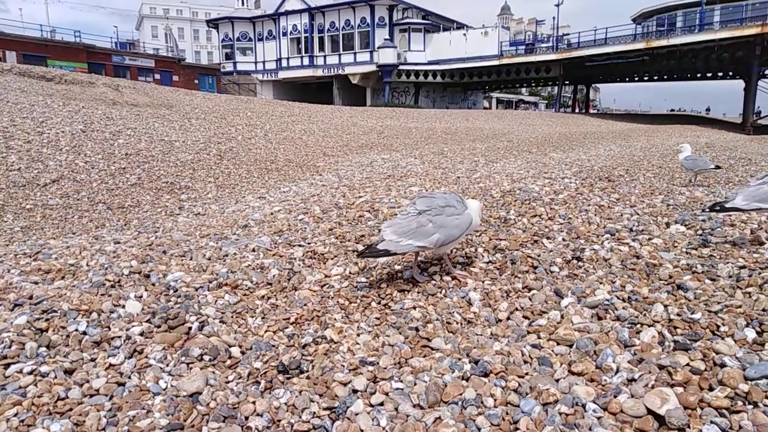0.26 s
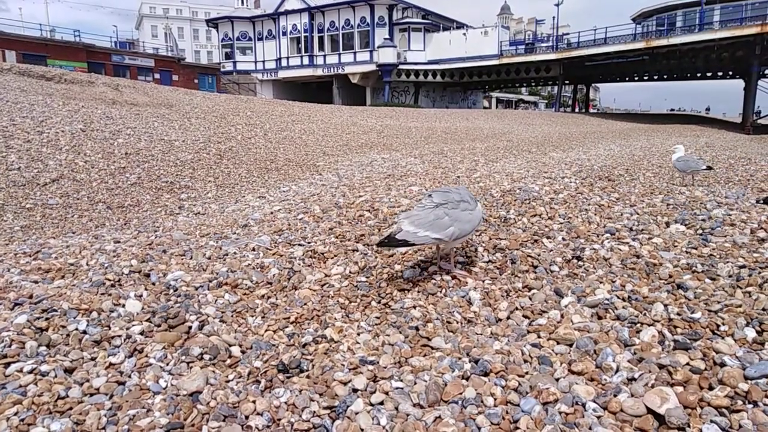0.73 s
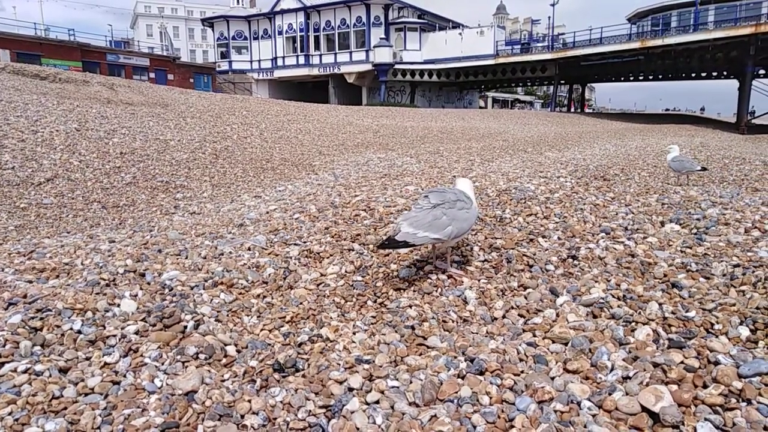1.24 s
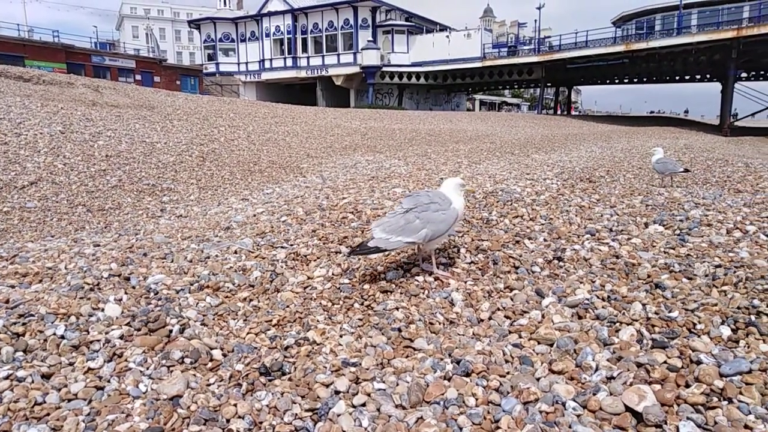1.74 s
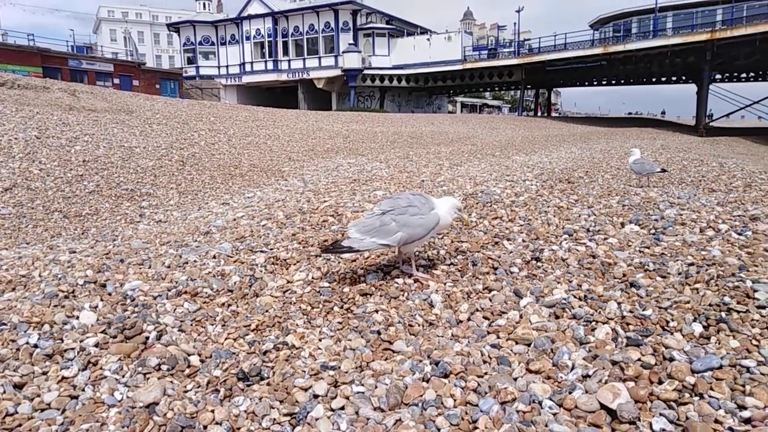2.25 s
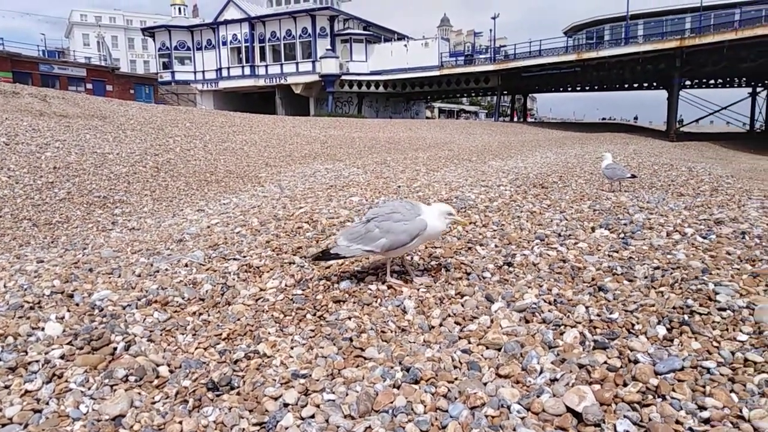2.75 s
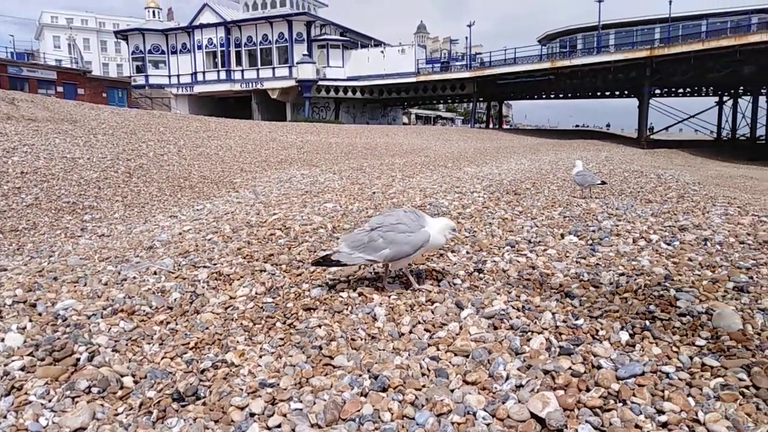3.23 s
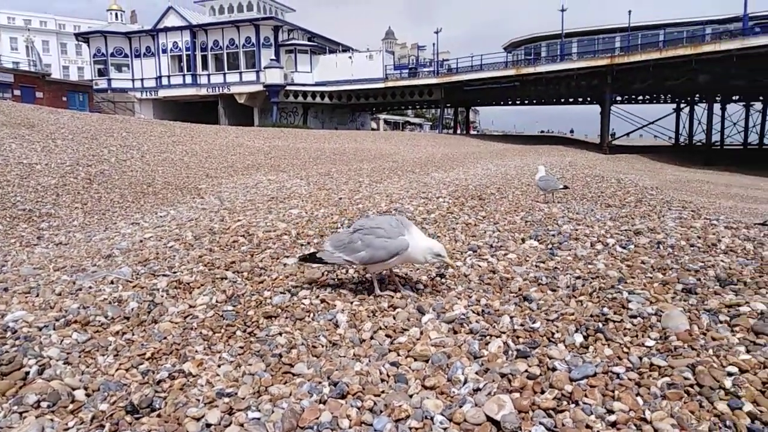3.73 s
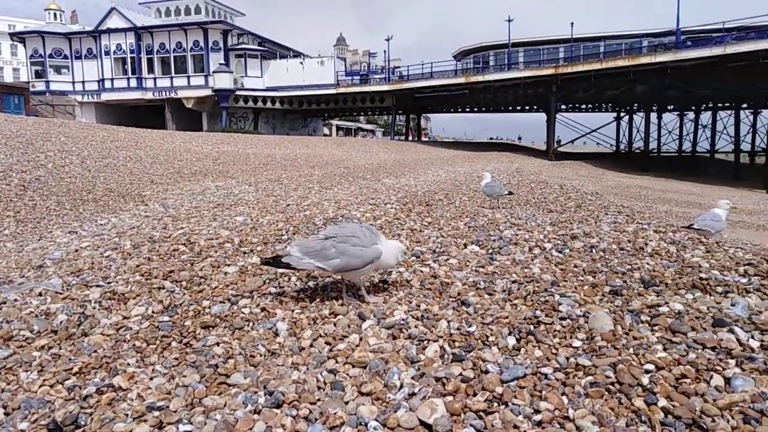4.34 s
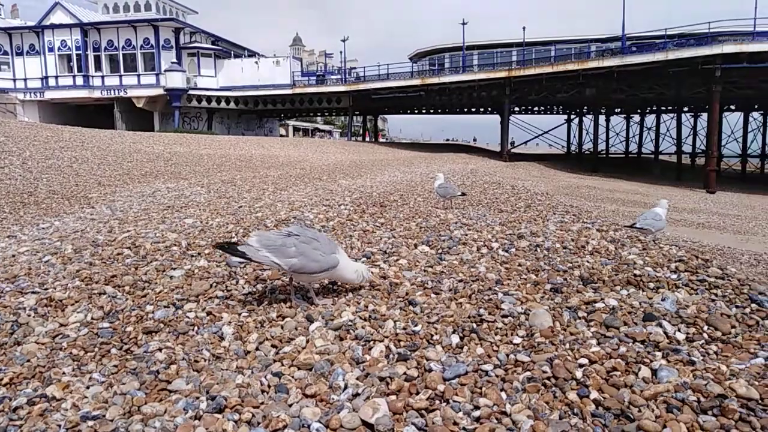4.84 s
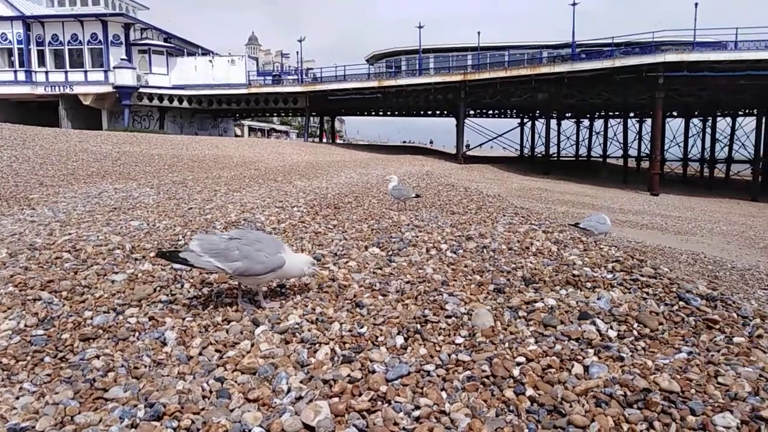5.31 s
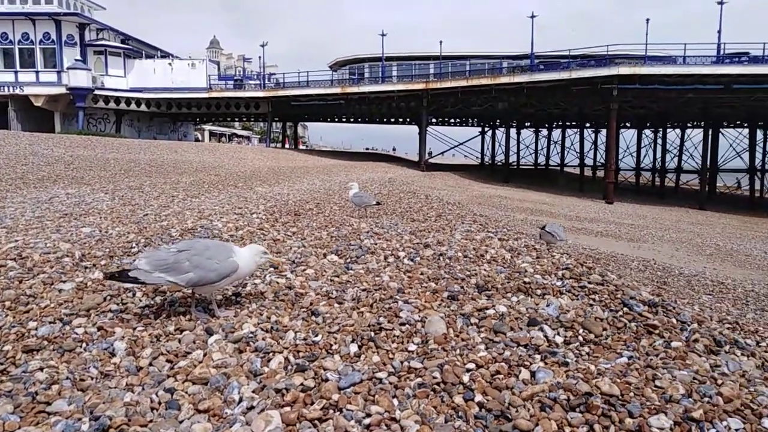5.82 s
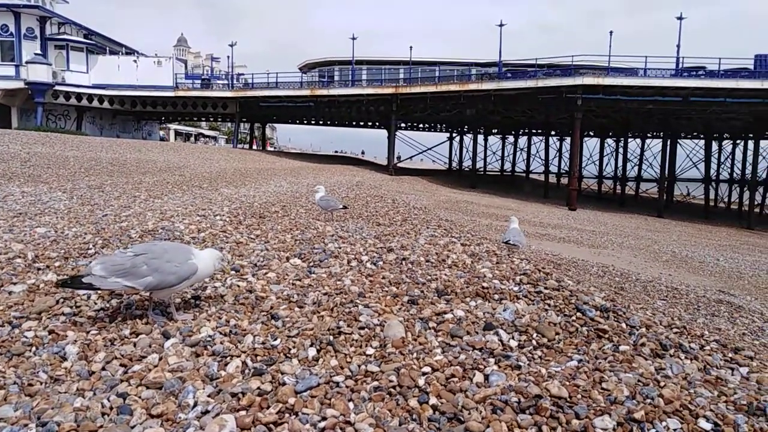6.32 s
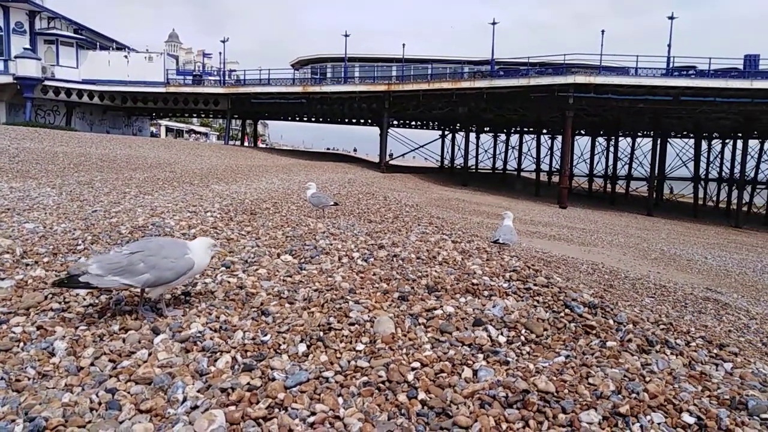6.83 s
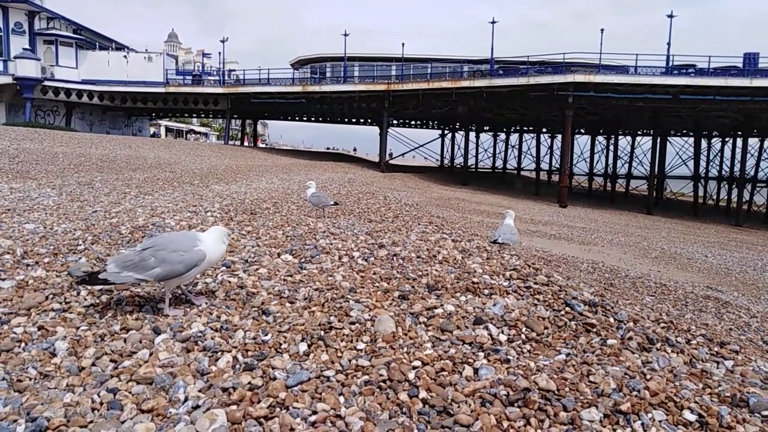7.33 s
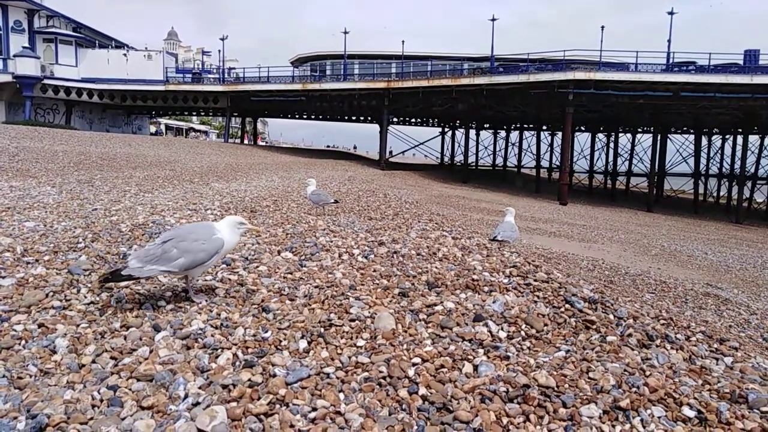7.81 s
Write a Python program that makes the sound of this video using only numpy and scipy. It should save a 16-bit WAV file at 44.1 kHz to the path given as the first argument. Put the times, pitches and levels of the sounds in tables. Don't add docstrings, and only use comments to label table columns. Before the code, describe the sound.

Outdoor stereo beach ambience: a near gull's high whistled cry, left of centre, opens the scene and returns twice, weaker. Distant adult gulls mew softly, then give a run of short falling yelps. Small stones knock and grind close to the right. Surf hisses steadily, rising once mid-way, and low gust thumps hit the microphone early and again later.

```python
import sys
import numpy as np
from scipy import signal
from scipy.fft import rfft, irfft
from scipy.io import wavfile
from scipy.ndimage import uniform_filter1d

SR = 44100
rng = np.random.default_rng(int(sys.argv[2]) if len(sys.argv) > 2 else 0)


def bounce(signal):
    frames = np.transpose(np.atleast_2d(signal))
    limited = np.clip(frames, -1, 1)
    pcm = np.round(limited * 32767).astype(np.int16)
    wavfile.write(sys.argv[1], SR, pcm)


def how_loud(loudness_db):
    steps = np.asarray(loudness_db, float) / 20
    return 10 ** steps


N = 355887

# [t/s, left over right/dB, breath re whistle/dB, flutter depth/dB]
CRIES = [
    (.3, 8.5, -25.5, 2),
    (3.55, 8, -11, 11),
    (6.0, 5.5, -21, -2.5),
]
# [t/s, length/s, start f/Hz, end f/Hz, level/dB]
FIRST_CRY = [(0.31, 0.012, 4050, 4840, -41), (0.313, 0.026, 3430, 3215, -45),
             (0.347, 0.013, 3230, 3460, -44), (0.336, 0.016, 4780, 4980, -39),
             (0.35, 0.031, 4010, 4045, -34.5), (0.38, .018, 4050, 4030, -49),
             (0.383, 0.023, 4650, 4760, -34), (0.408, 0.011, 4460, 4560, -32),
             (.398, .027, 5000, 5500, -34), (.422, .127, 5670, 5630, -31), (.551, .158, 5140, 5020, -28.5),
             (.539, .016, 5520, 5170, -33), (.699, .014, 4890, 4430, -33), (0.708, 0.11, 4380, 4250, -30.5),
             (0.814, 0.028, 3670, 3450, -45), (0.849, 0.018, 2950, 2850, -55)]
SECOND_CRY = [
    (3.59, .025, 6600, 6750, -51),
    (3.617, .062, 4590, 4640, -44),
    (3.665, .035, 5150, 5430, -45),
    (3.7, .229, 5400, 5110, -42.5),
    (3.942, .095, 4530, 4430, -44),
]
THIRD_CRY = [(6.022, 0.02, 2920, 2920, -60), (6.033, 0.0305, 3690, 3400, -54.5),
             (6.055, 0.035, 3430, 3440, -48), (6.086, 0.049, 4200, 4400, -47.5),
             (6.122, 0.023, 5200, 5470, -45.5), (6.152, 0.05, 5840, 5690, -46.5),
             (6.2, 0.019, 5650, 5350, -56), (6.366, 0.012, 4980, 4540, -50),
             (6.211, .162, 5270, 5100, -44.5), (6.378, 0.13, 4440, 4274, -37.5),
             (6.52, 0.02, 3800, 4000, -74)]
# [t/s, length/s, start f/Hz, end f/Hz, level/dB]
HOARSE_STRAND = [(.325, .06, 4320, 4570, -51), (.36, 0.053, 3370, 3260, -57), (.4, 0.019, 3630, 3780, -52),
                 (0.425, 0.054, 4620, 4700, -48), (.475, 0.086, 4840, 4540, -48),
                 (.53, 0.14, 4580, 4260, -42), (6.12, 0.1, 4800, 4640, -56),
                 (6.221, 0.16, 4480, 4130, -56.5)]
# [f/Hz, level/dB]
BEAK = [(5900, -31), (6300, 28), (6900, -34.5), (7100, -40.5), (7900, 13), (8100, -15.5), (8400, -65),
        (9700, -49), (10300, -32.5), (12500, -29), (14000, -52.5)]

# [t/s, level/dB, hold/s, lower edge f/Hz]
SHIFTS = [(0.206, -62, 0.012, 9400), (0.597, -68.5, 0.034, 11000), (1.03, -79, 0.0045, 12000),
          (1.21, -65.5, 0.034, 4000), (2.604, -67, 0.017, 5900), (2.877, -59, 0.091, 7250),
          (3.035, -69.5, 0.056, 7450), (3.2, -94, 0.11, 8060), (3.457, -63.5, 0.089, 5030),
          (3.604, -62, 0.081, 6800), (3.818, -52, 0.1, 5500), (3.971, -55.5, 0.025, 5460),
          (4.063, -54.5, 0.024, 6760), (4.155, -57, 0.02, 6800), (4.274, -63.5, 0.0079, 7000),
          (4.398, -60, 0.08, 7100), (4.57, -55.5, 0.057, 5700), (4.715, -66.5, .04, 8050),
          (4.843, -70, 0.019, 5130), (4.903, -66.5, 0.054, 7200), (5.02, -69, .02, 7200),
          (5.094, -72.5, 0.1, 9100), (5.247, -68, 0.098, 8000), (5.868, -60, 0.016, 7000),
          (6.274, -66, 0.055, 9800), (6.596, -59, 0.04, 9750), (6.698, -61.5, .01, 7900),
          (6.774, -62.5, 0.021, 8400), (6.958, -64.5, 0.027, 8600), (7.208, -71, 0.11, 9700),
          (7.368, -64, 0.023, 8330), (7.828, -64.5, 0.023, 8500)]
# [t/s, peak level/dB, left over right/dB, ring f/Hz]
KNOCKS = [(.1949, -37, -5, 10300), (1.0335, -48, -6, 13000), (1.1877, -33, -3, 5040),
          (1.1912, -28.5, 2.5, 5960), (2.607, -40, 7, 6600), (2.758, -44, -10, 10000),
          (2.8584, -44, -9, 12000), (2.8862, -46, -9, 12000), (2.9126, -30, -10, 10500),
          (3.0599, -37, -10, 10500), (3.457, -23, -6, 10600), (3.6038, -33.5, -6, 12000),
          (3.8214, -36, -9, 12100), (3.9815, -34, -1, 8360), (4.1505, -36, -3, 11000),
          (4.4486, -42, -12, 11400), (4.5497, -38, -6, 10600), (4.559, -33, 0, 8000),
          (4.5886, -30, -8, 11800), (4.7542, -40.5, -7, 11200), (4.8339, -37, -9, 7940),
          (4.8852, -32, -1, 5800), (4.9586, -38.5, -8, 10400), (5.0226, -35, -6, 11300),
          (5.0651, -36.5, -10, 10400), (5.139, -42.5, -9, 9700), (5.166, -42, -7, 11600),
          (5.2868, -30, -7, 6400), (5.8175, -40, -12, 13400), (5.862, -35, -1, 12100),
          (6.542, -41, -6, 11700), (6.6011, -38, -7, 5700), (6.7492, -34, 2, 4600), (6.752, -32, -6, 13700),
          (6.773, -34, -7, 10400), (6.8665, -38, -7, 10100), (6.9564, -37, -0.5, 7100),
          (7.3667, -37.5, -11, 11800), (7.8184, -38, 2, 5600)]
# [f/Hz, level/dB]
GRIT = [(2500, -23), (4000, 0.5), (6000, 12.5), (6800, -7.5), (7500, 4), (8500, 4), (11000, 6),
        (13000, 2.5), (14300, -5), (15500, -50)]
# [f/Hz, level/dB]
STONE = [(2500, -11), (4500, -1), (13000, 1.5), (16000, -10)]

# [t/s, f/Hz, level/dB]
MEWS = [
    [(.505, 1082, -62), (.56, 1035, -61), (.645, 855, -59.5)],
    [(.505, 1194, -54), (.54, 1219, -57), (.58, 1340, -64)],
    [(.635, 1036, -54), (.69, 1026, -54)],
    [(.695, 990, -60), (.745, 910, -60.5)],
    [(1.04, 900, -63), (1.07, 968, -57.5), (1.105, 910, -60)],
    [(1.33, 1266, -72), (1.355, 1287, -53), (1.38, 1263, -59), (1.48, 1273, -57), (1.58, 1268, -64),
     (1.655, 1232, -66)],
    [(1.925, 1820, -70), (2.0, 1990, -75)],
    [(2.045, 1880, -67), (2.085, 1840, -69)],
    [(2.045, 1280, -56), (2.09, 1311, -58), (2.125, 1263, -64), (2.205, 1293, -53.5), (2.255, 1285, -62.5),
     (2.355, 1322, -56.5), (2.41, 1235, -62)],
]
# [t/s, level/dB, f/Hz, length/s, third multiple/dB]
YELPS = [(1.665, -63.5, 1188, 0.09, 2.5), (2.405, -65, 1214, 0.082, 7.5), (2.54, -69, 1045, 0.066, 2),
         (2.68, -70, 1025, 0.049, 9), (2.925, -67, 1101, 0.09, 14.5), (3.105, -69.5, 1085, 0.047, 13),
         (3.2, -63.5, 1108, .09, 2), (3.345, -68, 1092, .05, 11), (3.45, -67, 1103, 0.075, 10.5),
         (3.76, -63, 1120, 0.053, 2), (3.9, -70, 1153, 0.082, 14), (4.035, -62.5, 1122, 0.059, 3),
         (4.21, -74.5, 1130, 0.074, 10.5), (4.305, -61.5, 1132, 0.072, 5), (4.45, -70, 1165, 0.089, 0),
         (4.62, -62.5, 1135, 0.072, -9), (4.85, -64.5, 1140, 0.054, 7), (4.95, -60, 1106, 0.085, -10),
         (5.345, -66.5, 1126, .05, -3), (5.43, -59.5, 1163, 0.083, -11.5)]
YELP_MULTIPLES = [2.5, -4, -2, -15]

# [f/Hz, level/dB per Hz]
SURF = [(40, -75.5), (90, -73.5), (170, -70.5), (260, -74.5), (430, -77.5), (700, -80), (1400, -86.5),
        (2200, -85.5), (2650, -91), (3000, -108), (3350, -99), (3750, -101), (4400, -91.5), (4850, -96),
        (5250, -105), (6500, -112), (15000, -125)]
# [f/Hz, left over right/dB]
SURF_PAN = [(500, 0), (1200, -0.5), (2200, 4.5), (3000, -3), (4400, 7), (9000, 2)]
# [f/Hz, share 0-1]
SAME = [(200, 1), (450, 1), (700, 0.47), (2200, 0.58)]
# [t/s, surge/dB]
SURGE = [(0, -0.5), (1.5, -1.5), (2.2, 0.5), (2.8, 3), (3.4, 7.5), (4.2, 4.5), (5, 1.5), (6.2, 0), (7.4, 2),
         (8.07, 0.5)]
# [t/s, dip f/Hz, dip depth/dB, dip width/Hz]
TURN = [(0, 1430, 21, 216), (1.5, 1520, 22.5, 239), (2.8, 1446, 24, 170), (3.8, 1550, 17, 119),
        (5, 1477, 5.5, 80), (6, 1257, 13.5, 120), (8.07, 1317, -2.5, 68.4)]

# [t/s, level/dB, left over right/dB]
BREEZE = [
    (0.0, -45.5, -2),
    (4.74, -61.5, -2.5),
    (5.08, -40, 3.5),
    (8.07, -75, -5.5),
]
# [t/s, level/dB, length/s]
THUMPS_LEFT = [(0.625, -35.5, 0.021), (0.853, -36, 0.029), (0.899, -36, 0.018), (0.986, -31, 0.023),
               (1.054, -23.5, 0.019), (1.084, -18.5, 0.0033), (1.137, -30.5, 0.048), (1.216, -33, 0.011),
               (1.294, -32.5, 0.037), (1.344, -32.5, 0.014), (2.472, -35, 0.03), (4.4, -30.5, 0.0063),
               (4.62, -54, 0.043), (4.76, -43, 0.066), (4.89, -45, 0.027), (4.956, -23.5, 0.0079),
               (4.978, -20, 0.011), (5.073, -25.5, 0.029), (5.15, -24.5, 0.0021), (5.318, -24.5, 0.0076),
               (5.361, -20.5, 0.027), (5.397, -30.5, 0.031), (5.512, -21, 0.0027), (5.557, -28, 0.051),
               (5.752, -32, 0.019), (5.83, -35, 0.05), (5.921, -27.5, 0.036), (5.968, -26.5, 0.0084),
               (6.13, -33, 0.073), (6.196, -28, 0.0084), (6.221, -29.5, 0.02), (6.265, -30, 0.021),
               (6.313, -31.5, 0.0071), (6.455, -39, 0.07)]
THUMPS_RIGHT = [(0.029, -30.5, 0.01), (0.325, -43, 0.012), (0.38, -35, 0.0059), (0.449, -38.5, 0.08),
                (0.895, -28.5, 0.019), (0.967, -25, 0.0087), (1.039, -28, 0.0089), (1.09, -31, 0.023),
                (1.141, -30.5, 0.012), (1.269, -31.5, 0.032), (1.404, -32, 0.028), (1.693, -39, 0.03),
                (1.746, -32, 0.0077), (2.211, -37, 0.011), (2.409, -33.5, 0.08), (2.474, -36, 0.0073),
                (4.497, -40.5, 0.05), (4.682, -41, 0.016), (4.737, -37, 0.078), (4.772, -47, 0.0084),
                (5.142, -37, 0.03), (5.263, -30, 0.037), (5.41, -27, 0.013), (6.191, -36, 0.034),
                (6.338, -37, 0.016), (6.521, -43, 0.023)]
# [f/Hz, level/dB]
THUMP = [(25, -70), (50, -11.5), (80, 4.5), (120, 0), (200, -5), (350, -25), (700, -44), (3000, -110)]

# [f/Hz, level/dB per Hz]
GATE = [(1000, -100), (1500, -89), (2500, -100), (3000, -99), (4500, -103), (6000, -103), (14000, -105)]

SCOOP_HZ, SETTLE_S, DROOP_HZ, DROOP_S, HELD_S = 170, 0.0042, 165, 0.0193, 0.084
TOP_HZ = 5340
FADE_DB = -7.5
FLUTTER_PER_S = 37

SLIDE_DB_PER_S, SETTLE_DB_PER_S, TRICKLE_DB_PER_S, TRICKLE_DB = 592, 176.5, 45.5, -13
THIN_DB, EDGE_HZ = -10, 300
SNAP_S, CRACK_DB, RING_DB, RATTLE_DB = 0.0016, -11, -23, -33

ROAR_SHARE, WASH_SHARE, FIZZ_SHARE, FIZZ_DB = 0.44, 0.65, 1.78, -5.5

LAG, FAR_LAG = 19, 4
HISS_DB = -81.5
MASK_TOP_DB = -69


def evened(x):
    return x / np.sqrt(np.mean(x ** 2) + 1e-20)


def read(points, hz):
    f, value = np.transpose(points)
    return np.interp(np.log(hz + 1), np.log(f + 1), value)


def add(mix, s, sound):
    part = mix[..., max(round(s * SR), 0):][..., :sound.shape[-1]]
    part += sound[..., :part.shape[-1]]


def panned(x, db):
    return x * how_loud([db / 2, -db / 2]).reshape(2, -1)


def coloured(x, points):
    gain = how_loud(read(points, np.fft.rfftfreq(x.shape[-1], 1 / SR)))
    return irfft(rfft(x) * gain, x.shape[-1])


def drift(shape, sizes):
    x = rng.standard_normal(shape)
    for axis, size in enumerate(sizes):
        x = uniform_filter1d(uniform_filter1d(x, size, axis), size, axis)
    return evened(x)


def voice(t, hz, level_db, tones, waver, edge_s):
    turns = np.cumsum(hz * (1 + waver * drift(len(t), [120]))) / SR
    stack = sum(how_loud(tones(k, hz)) * np.sin(2 * np.pi * k * turns) for k in range(1, 5))
    ends = np.clip(np.minimum(t - t[0], t[-1] - t) / edge_s, 0, 1)
    return np.sqrt(2) * how_loud(level_db) * stack * ends


def beach(x, t60, hz):
    size = SR // 2
    taps = rng.choice([-1., 1.], (2, size)) * (rng.random((2, size)) < .05)
    tail = signal.lfilter(*signal.butter(2, hz, fs=SR), taps)
    tail = tail * how_loud(-60 * np.arange(size) / SR / t60)
    return signal.fftconvolve(x[None], tail / np.linalg.norm(tail[0]), axes=1)[:, :N]


def young_gull():
    out = np.zeros((2, N))
    haze = np.zeros(N)
    throat = [(3300, -17.5), (3900, 13.0), (5800, 8), (6100, -19.5)]
    breath = evened(coloured(rng.standard_normal(N), throat))

    def overtones(k, f):
        if k == 1:
            return 0
        return np.where(k * f < 14500, read(BEAK, k * f) - 1.0 * (k - 2), -99)

    for row in FIRST_CRY + SECOND_CRY + THIRD_CRY + HOARSE_STRAND:
        _, pan_db, breath_db, flutter_db = [cry for cry in CRIES if cry[0] <= row[0] + .05][-1]
        t, hz, level_db = register(*row)
        weak = np.clip((-39.5 - level_db.max()) / 12, 0, 1)
        rough_db = level_db + (0.51 + 4.3 * weak) * drift(len(t), [200])
        note = voice(t, hz, rough_db, overtones, 0.0029 + 0.0085 * weak ** 2, 0.013)
        flutter = np.sin(np.pi * FLUTTER_PER_S * t + 0.8 * np.sin(40 * t)) ** 6
        note *= how_loud(-flutter_db * np.clip((t - t[0]) / .2, .25, 1) * flutter)
        air = how_loud(level_db + breath_db) * breath[round(t[0] * SR):][:len(t)]
        note += air
        add(haze, t[0], how_loud(13) * air)
        add(out, t[0], note * how_loud([[0], [-pan_db]]))
    out[1] = coloured(out[1], [(6000, -3.5), (9000, 11)])
    return out + panned(how_loud(-20.5) * beach(out[0] + haze, 0.57, 6900), 3.0)


def register(start, length, from_hz, to_hz, level_db):
    t = np.arange(start - .005, start + length + .004, 1 / SR)
    u = np.clip((t - start) / length, 0, 1)
    held = np.clip(length / HELD_S - .5, 0, 1)
    scoop = np.sign(TOP_HZ - from_hz) * SCOOP_HZ * np.exp(-u * length / SETTLE_S)
    droop = DROOP_HZ * np.exp(-(1 - u) * length / DROOP_S)
    hz = from_hz + (to_hz - from_hz) * u + held * (scoop - droop)
    return t, hz, level_db + FADE_DB * held * u


def shingle():
    grains = how_loud(4.5 * np.minimum(rng.exponential(1, (2, N)), 5)) * (rng.random((2, N)) < 1500 / SR)
    grit = evened(grains * rng.standard_normal((2, N))) + 1.6 * rng.standard_normal((2, N))
    slips_db = 1.4 * drift(N, [180])
    grit = panned(evened(grit) * how_loud(0.5 + slips_db), -7.5)
    hz, t, z = signal.stft(grit, SR, nperseg=256)
    stones_db = 2.0 * drift(z.shape[1:], [4, 30])
    z = z * shifts(t, hz) * how_loud(read(GRIT, hz)[:, None] + 3.0 + stones_db)
    crunch = signal.istft(z, SR, nperseg=256)[1][:, :N]

    knocks = np.zeros((2, N))
    chips = rng.standard_normal((len(KNOCKS), 4000))
    for (s, peak_db, pan_db, ring_hz), chip in zip(KNOCKS, chips):
        add(knocks, s, how_loud([[peak_db + pan_db + 1.0], [peak_db + 1.0]]) * knock(ring_hz, chip))
    return coloured(knocks, STONE) + crunch


def shifts(t, hz):
    power = 0
    for s, level_db, hold, low_hz in SHIFTS:
        after = np.maximum(t - s - hold, 0)
        fall = how_loud(-2 * SETTLE_DB_PER_S * after) + how_loud(2 * (TRICKLE_DB - TRICKLE_DB_PER_S * after))
        rise = how_loud(2 * (level_db - SLIDE_DB_PER_S * np.clip(s - t, 0, 1)))
        colour = how_loud(THIN_DB * (1 - np.tanh((hz - low_hz) / EDGE_HZ)))
        power = power + np.outer(colour, rise * fall)
    return np.sqrt(power)


def knock(hz, chip):
    u = np.arange(len(chip)) / SR
    snap = np.cos(2 * np.pi * hz * u) * how_loud(-60 * u / SNAP_S) + (u == 0)
    crack = how_loud(CRACK_DB - 60 * u / 0.012) * chip
    ring = evened(signal.lfilter(*signal.iirpeak(hz, 14, SR), chip))
    tail = (how_loud(RING_DB) * ring + how_loud(RATTLE_DB) * chip) * how_loud(-60 * u / 0.09)
    return snap + crack + tail


def far_gulls():
    out = np.zeros(N)
    mew = lambda k, f: [-.8, -4, -16, -36][k - 1]
    for rows in MEWS:
        s, hz, level_db = np.transpose(rows)
        t = np.arange(s[0], s[-1], 1 / SR)
        rough_db = np.interp(t, s, level_db) + 1.6 * drift(len(t), [600])
        add(out, s[0], voice(t, np.interp(t, s, hz), rough_db, mew, .006, 0.03))
    for s, level_db, hz, length, third_db in YELPS:
        yelp = lambda k, f: YELP_MULTIPLES[k - 1] + third_db * (k == 3)
        t = np.arange(0, length, 1 / SR)
        falling_hz = hz * (1.03 - .11 * (t / length) ** 1.5)
        add(out, s, voice(t, falling_hz, level_db + .5, yelp, .012, .015))
    return panned(out, .8) + how_loud(-7) * beach(out, 0.35, 4000)


def sea():
    hz, t, z = signal.stft(rng.standard_normal((2, N)), SR, nperseg=1024, noverlap=768)
    hz = hz[:, None]
    surge_db = np.interp(t, *np.transpose(SURGE))
    roar_db, wash_db = ROAR_SHARE * surge_db, WASH_SHARE * surge_db
    fizz_db = FIZZ_SHARE * surge_db + FIZZ_DB
    swell_db = np.where(hz < 1400, roar_db, np.where(hz < 2900, wash_db, fizz_db))
    s, *columns = np.transpose(TURN)
    dip_hz, depth_db, width_hz = (np.interp(t, s, c) for c in columns)
    dip_db = depth_db * 0.97 * np.exp(-((hz - dip_hz) / width_hz) ** 2)
    patches_db = np.interp(hz, [500, 2500, 3200], [.8, 1.2, 4.0]) * drift(z.shape[1:], [6, 10])

    same, pan_db = np.clip(read(SAME, hz), 0, 1), read(SURF_PAN, hz)
    right = same * z[0] + np.sqrt(1 - same ** 2) * z[1]
    z = np.array([z[0] * how_loud(pan_db / 2), right * how_loud(-pan_db / 2)])
    z = z * how_loud(read(SURF, hz) + 10 * np.log10(SR / 2) + swell_db - dip_db + patches_db)
    return signal.istft(z, SR, nperseg=1024, noverlap=768)[1][:, :N]


def wind():
    low = evened(coloured(rng.standard_normal((2, N)), THUMP))
    flap = [(100, -33), (250, 12.5), (400, 4.0), (800, -12.0), (3000, -100)]
    high = evened(coloured(rng.standard_normal((2, N)), flap))
    s, level_db, pan_db = np.transpose(BREEZE)
    t = np.arange(N) / SR
    lumps_db = 5.3 * np.array([drift(N, [900]), drift(N, [900])])
    out = panned(low * how_loud(np.interp(t, s, level_db) + lumps_db), 3.3 * np.interp(t, s, pan_db))
    for port, thumps in enumerate([THUMPS_LEFT, THUMPS_RIGHT]):
        for s, level_db, length in thumps:
            shape = np.hanning(round((2.66 * length + 0.012) * SR))
            start = max(round(s * SR) - len(shape) // 2, 0)
            span = slice(start, start + len(shape))
            air = low[port, span] + how_loud(-20.5 + 0.75 * (level_db + 35.5)) * high[port, span]
            air = air / np.sqrt(np.mean((air * shape) ** 2) / np.mean(shape ** 2))
            add(out[port], start / SR, how_loud(level_db) * shape * air)
    return out


def scene():
    near, far = young_gull() + sea() + shingle(), far_gulls()
    left = np.roll(near[0], LAG) + np.roll(far[0], FAR_LAG)
    return np.array([left, near[1] + far[1]]) + wind()


def bands(hz):
    place = np.cumsum(hz[1] / np.clip(hz / 32, 90, 300)).astype(int)
    return (place == np.arange(place[-1] + 1)[:, None]).astype(float)


def banded(z, pick, size):
    power = pick / pick.sum(1)[:, None] @ uniform_filter1d(abs(z) ** 2, size, 2)
    return 10 * np.log10(abs(power) * 1024 / (1.5 * SR) * 2 + 1e-16)


def shut(z, pick, margin_db, depth_db):
    return z * (pick.T @ how_loud(-depth_db * np.clip(.5 - margin_db / 2, 0, 1)))


def masking(band_db, centre_hz):
    octaves = np.log2(centre_hz[:, None] / centre_hz)
    slope_db = np.where(octaves > 0, -20 * octaves - 45 * octaves ** 2, 75 * octaves)
    power = how_loud(2 * slope_db) @ how_loud(2 * np.minimum(band_db, MASK_TOP_DB))
    return 10 * np.log10(power) - np.interp(centre_hz, [2400, 2900], [19, 14.5])[:, None]


def roll_off(x):
    return signal.sosfilt(signal.butter(12, 15480, fs=SR, output="sos"), x)


def record(dry):
    x = signal.sosfilt(signal.butter(4, 54, "high", fs=SR, output="sos"), dry)
    hz, _, z = signal.stft(x, SR, nperseg=1024, noverlap=768)
    pick = bands(hz)
    centre_hz = pick @ hz / pick.sum(1)

    unsure_db = np.maximum(18.0 * drift((len(pick), z.shape[2]), [1, 7]), -13)
    depth_db = np.interp(centre_hz, [2000, 4000], [15, 22])[:, None]
    over_db = banded(z, pick, size=10) - read(GATE, centre_hz)[:, None]
    doubt = np.clip((13 - over_db) / 7, 0, 1)
    z = shut(z, pick, over_db + doubt * unsure_db, depth_db)

    hiss = coloured(rng.standard_normal((2, N)), [(3500, 15.5), (8000, 2.0), (13000, -3.5)])
    z = z + signal.stft(how_loud(HISS_DB) * hiss, SR, nperseg=1024, noverlap=768)[2]

    doubt = doubt * np.clip((over_db + 9) / 7, .12, 1)
    band_db = banded(z, pick, size=6)
    margin_db = band_db + .9 * doubt * unsure_db[::-1] - masking(band_db, centre_hz)
    z = shut(z, pick, margin_db, 35)
    z = z * how_loud(np.interp(hz, [14400, 14600], [0, -28]))[:, None]
    return roll_off(signal.istft(z, SR, nperseg=1024, noverlap=768)[1][:, :N])


dry = scene()
out = record(dry)
bounce(out)
```